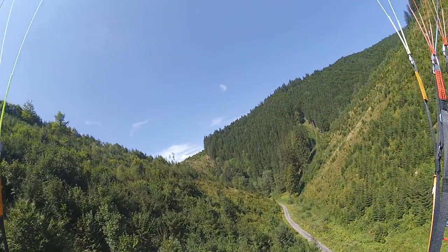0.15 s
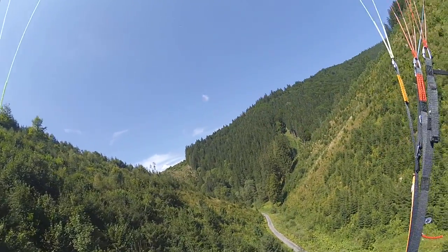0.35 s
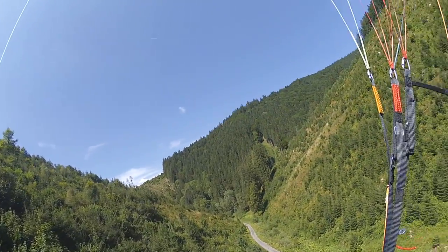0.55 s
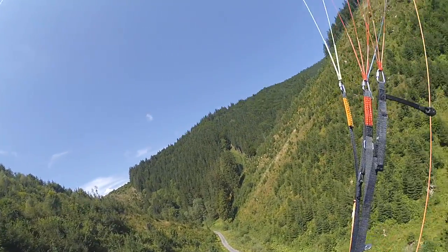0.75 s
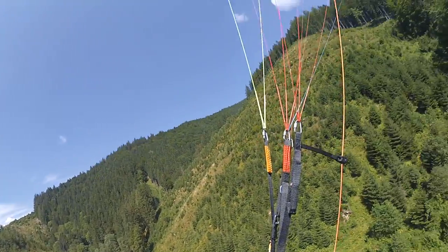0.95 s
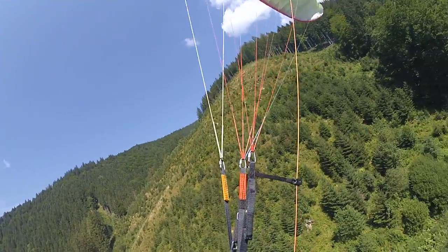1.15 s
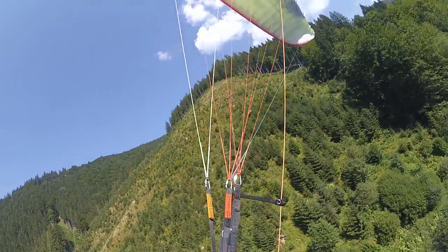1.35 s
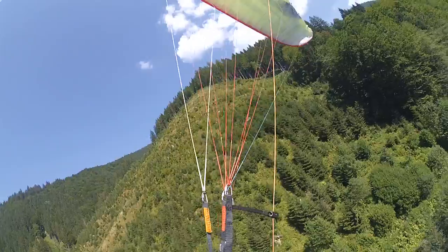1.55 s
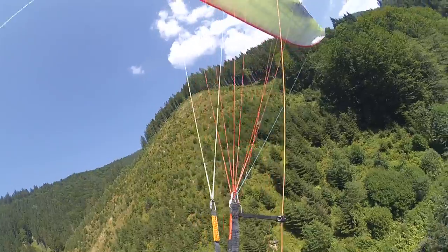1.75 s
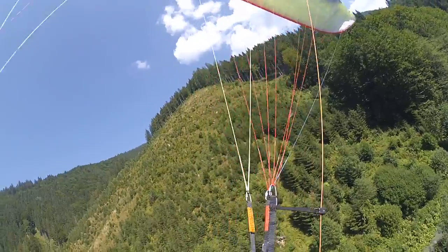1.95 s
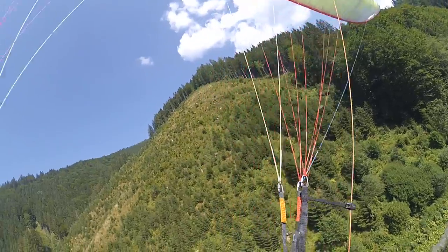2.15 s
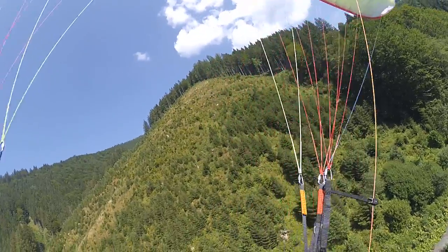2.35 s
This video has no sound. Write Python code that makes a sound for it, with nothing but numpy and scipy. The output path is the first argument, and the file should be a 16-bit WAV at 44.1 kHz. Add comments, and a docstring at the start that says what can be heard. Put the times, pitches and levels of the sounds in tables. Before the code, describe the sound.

Loud, low wind buffeting overloads a close microphone in flight above a wooded hillside. Irregular gusts thud and flutter, tiny dry ticks and soft rustles lie underneath, and the rumble weakens in the final part.

```python
"""Wind buffets a camera microphone on a paraglider above a wooded hillside.
From the start, eddies thump on the housing as deep swell and rumble, and shed a rough flutter.
Air hisses throughout with a trace of whistle: shaped noise and a wavering sine.
From about 0.4 s, fabric rustles (friction noise with crackles) and lines tick (decaying noise snaps).
Near 1.8 s a last strong thump lands, then the flow eases to the end."""
import sys
import numpy as np
from scipy import signal
from scipy.fft import rfft, irfft
from scipy.io import wavfile
from scipy.ndimage import uniform_filter1d

SR = 44100
rng = np.random.default_rng(int(sys.argv[2]) if len(sys.argv) > 2 else 0)


def dump_mix(stems):
    """Bounce the given channels to the path in sys.argv[1] as a 16-bit WAV at rate SR."""
    frames = np.atleast_2d(stems).T  # one column per channel
    limited = np.clip(frames, -1, 1)  # hard clip at full scale
    pcm = np.round(limited * 32767).astype(np.int16)
    wavfile.write(sys.argv[1], SR, pcm)


N = 110691
T = np.arange(N) / SR  # s

# hiss of the passing air: t/s, level/dB
AIR_LEVEL = [(0, -49.5), (.35, -52.5), (1.1, -52.5), (1.8, -55), (2.51, -54.5)]
# snaps of lines and fittings: t/s, peak level/dB
TICKS = [(0.4169, -33.5), (.4858, -36), (0.5092, -34), (.511, -35), (.5205, -39), (.751, -35.5),
         (0.8072, -35), (0.8418, -34), (1.467, -39), (1.4847, -29), (1.4919, -29.5), (1.72, -41),
         (1.732, -34.5), (2.07, -40), (2.103, -39), (2.326, -36)]
# fabric and lines sliding: start t/s, length t/s, friction level/dB at full motion
RUBS = [(0.429, 0.12, -55), (0.562, 0.17, -58), (0.718, 0.19, -58), (0.912, 0.14, -61),
        (1.267, 0.18, -53.5), (1.451, 0.12, -50.5), (1.589, 0.15, -57.5), (1.824, 0.14, -56),
        (2.041, 0.19, -51), (2.25, 0.15, -56), (2.403, 0.087, -52)]
# airflow at the microphone: t/s, low-end level/dB (before the swell and rumble trims), flutter level/dB
FLOW = [(0, -15, -30), (.22, -12, -31), (.33, -15.5, -32.5), (.62, -15, -30), (.87, -15, -32),
        (1.1, -13.5, -33), (1.4, -15, -29.5), (1.65, -14, -31), (1.85, -20, -34.5), (2.03, -20, -38.5),
        (2.25, -18, -35), (2.51, -20.5, -38.5)]
# single eddies: centre t/s, half-width t/s (to 1/e^2 of the dB change),
# then change of swell level/dB, rumble level/dB, flutter level/dB
GUSTS = [(0.089, 0.037, 8, 2, 3), (0.202, 0.028, 6, -4, 7.5), (0.308, .012, 5, 4, 4.5),
         (0.406, .035, 8.5, 9, 4.5), (0.524, 0.062, 8.5, 4.5, 2.5), (0.574, 0.011, -1, 9.5, 7.5),
         (0.75, 0.059, 4, 3.5, -0.5), (0.981, 0.074, 2, 8.5, 1.5), (1.397, 0.016, 8, 4.5, 1.5),
         (1.535, 0.041, 11, -3, 1.5), (1.843, 0.052, 14, -2, -1)]

# noise outlines, relative, since each noise is scaled to rms 1: f/Hz, level/dB
AIR_SPECTRUM = [(400, -1), (1500, 1), (2700, -3), (4500, -6.5), (7000, -11), (10000, -16), (14000, -29),
                (16000, -45)]
TICK_SPECTRUM = [(2000, -23), (4500, -5), (6900, 4), (8600, -2.5), (10500, -5), (13000, -22), (16000, -31)]
RUSTLE_SPECTRUM = [(600, -8), (1500, -2.5), (2600, 1), (4500, 0), (7000, 0.5), (9000, -3.5), (11000, -9.5),
                   (13500, -11.5), (15500, -33)]
FLUTTER_SPECTRUM = [(50, -20.5), (110, -1.5), (170, 1), (300, -6.5), (500, -13), (800, -21), (1300, -30),
                    (2000, -42), (4000, -57.5), (9000, -77)]
RUMBLE_SPECTRUM = [(15, -9), (35, -0.5), (56, -1.5), (80, -5), (120, -10.5), (170, -19), (300, -36),
                   (1000, -90.5)]
SWELL_SPECTRUM = [(6, -14), (14, -1), (30, 0), (42, -5), (70, -20), (150, -50), (600, -110)]

WHISTLE_HZ, WHISTLE_DB = 2770, -74
TICK_DECAY_S = 0.00033  # fall to 1/e
RUB_ATTACK_S, RUB_RELEASE_S, RUB_FLICKER_DB = 0.087, 0.088, 1.0
CRACKLE_PER_S, CRACKLE_SPREAD_DB = 630, 5
CRACKLE_DB = -6.5  # against the friction
SWELL_DB, RUMBLE_DB = -1, -4  # trims on the low-end level of the flow
STEADY_S = 0.15  # span over which swell and rumble keep their strength
EDDY_HZ, EDDY_DB = 110.6, 1  # rate and depth of the flutter's flicker
PRESSURE_DB = 3  # flutter flare per spread of low-end pressure
TOP_HZ = 15000


def undb(db):
    """Decibels to gain."""
    return 10 ** (np.asarray(db) / 20)


def unit(x):
    """Scale to a spread of 1, which is rms 1 for a centred signal."""
    return x / (np.std(x) + 1e-12)


def curve(table, axis=1):
    """One column of a table, joined by straight lines in time."""
    rows = np.array(table)
    return np.interp(T, rows[:, 0], rows[:, axis])


def colour(x, spectrum):
    """Filter by an outline in dB, interpolated over log frequency."""
    hz, db = np.array(spectrum).T
    f = np.maximum(np.fft.rfftfreq(N, 1 / SR), 1)
    gain = undb(np.interp(np.log(f), np.log(hz), db))
    return irfft(rfft(x) * gain, N)


def noise(spectrum):
    """Coloured noise of rms 1."""
    return unit(colour(rng.standard_normal(N), spectrum))


def walk(rate):
    """Smooth random wandering of spread 1, with `rate` new targets a second."""
    step = (T * rate).astype(int)
    targets = rng.standard_normal(N)[step]
    return unit(uniform_filter1d(targets, max(int(SR / rate), 2)))


def steady(x):
    """Hold the short-term strength of a turbulent signal near 1."""
    size = int(STEADY_S * SR)
    power = uniform_filter1d(x ** 2, size=size)
    return x / np.sqrt(uniform_filter1d(power, size=size // 2))


def air():
    """Smooth turbulent hiss of the passing air, with a faint whistle wavering in pitch and level."""
    hiss = noise(AIR_SPECTRUM) * undb(curve(AIR_LEVEL))
    hz = WHISTLE_HZ * (1 + .001 * walk(25))
    tone = np.sin(2 * np.pi * np.cumsum(hz) / SR)
    whistle = unit(tone * undb(3 * walk(4.6)))
    return hiss + whistle * undb(WHISTLE_DB)


def ticks():
    """Lines and fittings snap: tiny dry bursts of noise that die at once."""
    out, grain = np.zeros(N), noise(TICK_SPECTRUM)
    for at, peak_db in TICKS:
        age = np.maximum(T - at, 0)
        snap = grain * (T >= at) * np.exp(-age / TICK_DECAY_S)
        out = out + undb(peak_db) * snap / np.abs(snap).max()
    return out


def rustle():
    """Each slide of fabric swells and fades: fine friction noise with random crackles in it."""
    motion = np.zeros(N)
    for start, length, db in RUBS:
        # both ramps are centred on the edges of the slide
        rise = np.clip((T - start) / RUB_ATTACK_S + .5, 0, 1)
        fall = np.clip((start + length - T) / RUB_RELEASE_S + .5, 0, 1)
        motion = motion + undb(db) * rise * fall
    boost_db = CRACKLE_SPREAD_DB * np.minimum(rng.exponential(size=N), 2)
    sizes = rng.standard_normal(N) * undb(boost_db)
    struck = rng.random(N) < CRACKLE_PER_S / SR
    crackle = unit(colour(sizes * struck, RUSTLE_SPECTRUM))
    friction = noise(RUSTLE_SPECTRUM)
    flicker = undb(RUB_FLICKER_DB * walk(29))
    return motion * flicker * (friction + undb(CRACKLE_DB) * crackle)


def wind():
    """Large eddies swell, smaller ones rumble, and a flutter flares with each swing of pressure."""
    swell_db = rumble_db = curve(FLOW, axis=1)
    flutter_db = curve(FLOW, axis=2)
    for at, length, deep_db, low_db, high_db in GUSTS:
        bump = np.exp(-2 * ((T - at) / length) ** 2)
        swell_db = swell_db + deep_db * bump
        rumble_db = rumble_db + low_db * bump
        flutter_db = flutter_db + high_db * bump
    swell = steady(noise(SWELL_SPECTRUM))
    rumble = steady(noise(RUMBLE_SPECTRUM))
    pressure = np.abs(unit(swell + rumble))
    flare_db = EDDY_DB * walk(EDDY_HZ) + PRESSURE_DB * pressure
    flutter = unit(noise(FLUTTER_SPECTRUM) * undb(flare_db))
    low_end = swell * undb(swell_db + SWELL_DB) + rumble * undb(rumble_db + RUMBLE_DB)
    return low_end + flutter * undb(flutter_db)


def scene():
    """Air, rigging and wind summed at one microphone."""
    return (air() + ticks() + rustle() + wind())[None]


def record(dry):
    """The camera softly rounds the largest swings towards full scale, then cuts the top."""
    rounded = dry / (1 + dry ** 6) ** (1 / 6)
    # order 8, 0.2 dB ripple, 70 dB rejection
    top_cut = signal.ellip(8, .2, 70, TOP_HZ, fs=SR, output="sos")
    return signal.sosfilt(top_cut, rounded)


dry = scene()
out = record(dry)
dump_mix(out)
```